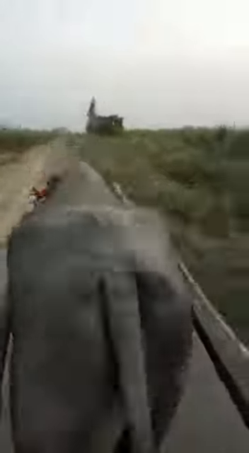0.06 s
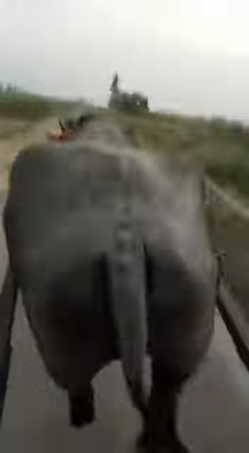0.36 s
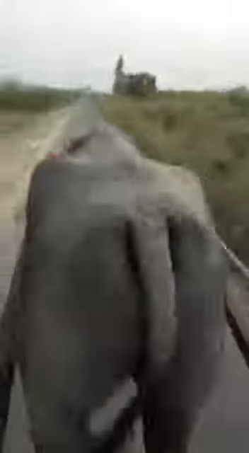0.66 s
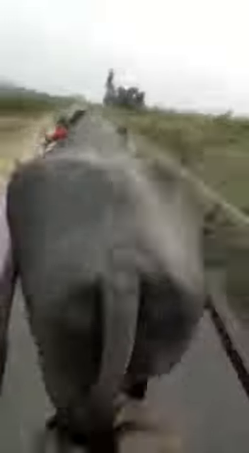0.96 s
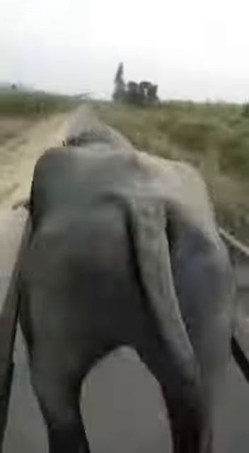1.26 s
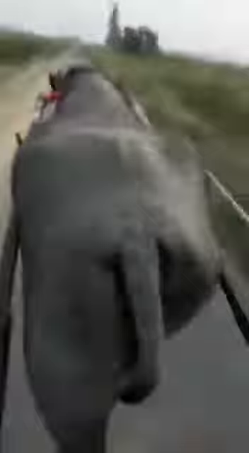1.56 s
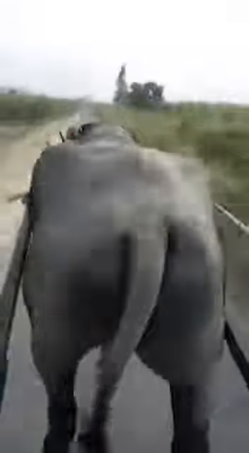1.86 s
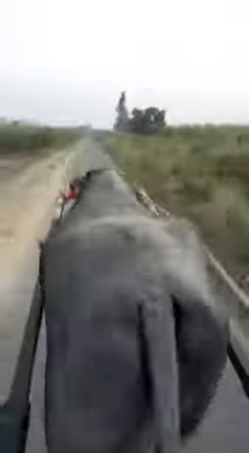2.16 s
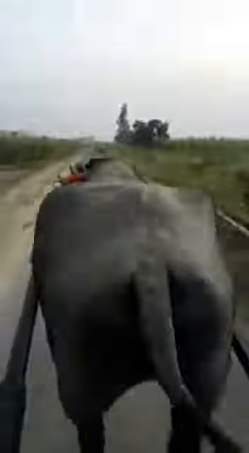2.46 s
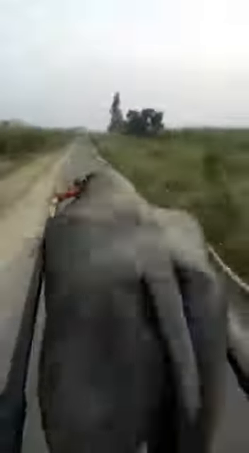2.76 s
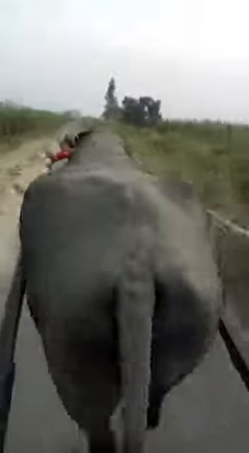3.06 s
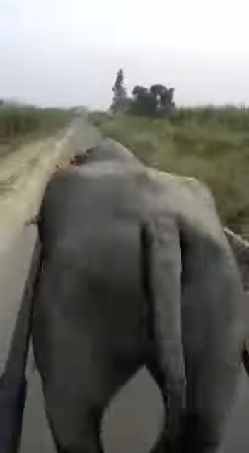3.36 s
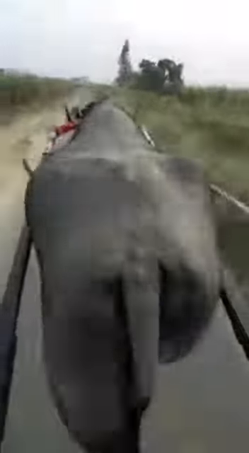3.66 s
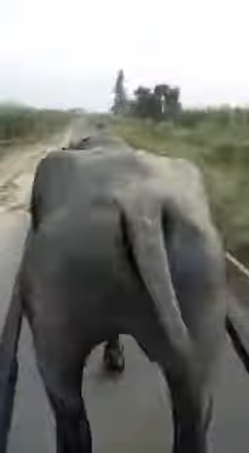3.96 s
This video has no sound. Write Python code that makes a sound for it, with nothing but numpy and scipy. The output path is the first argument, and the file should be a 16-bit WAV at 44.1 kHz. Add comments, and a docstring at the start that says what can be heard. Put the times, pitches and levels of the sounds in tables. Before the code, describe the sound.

Sharp paired hoof clops on pavement, with cart clacks, wheel rumble and wind buffeting.

```python
"""Buffalo cart on a paved road

From the driver's seat we hear hooves land in pairs, each with a double crack and a hollow ring,
then a lighter step scuffs the grit. The cart clacks, the harness clinks and the wheels rumble.
As the cart sways, wind buffets the two microphone openings in turn; the louder left side overloads."""
import sys
import numpy as np
from scipy import signal
from scipy.fft import rfft, irfft
from scipy.io import wavfile
from scipy.ndimage import uniform_filter1d

SR = 44100
rng = np.random.default_rng(int(sys.argv[2]) if len(sys.argv) > 2 else 0)


def persist_wave(psi):
    """Save psi, clipped to +-1, as 16-bit WAV."""
    counts = np.round(np.clip(psi, -1, 1) * 32767).astype(np.int16)
    wavfile.write(sys.argv[1], SR, np.atleast_2d(counts).T)


N = 176400  # 4 seconds
TIME = np.arange(N) / SR
HIT_RISE_S, CLACK_DECAY_S = 0.00047, 0.0024
RING_RISE_S, RING_DECAY_S = 0.0009, 0.0046


def gain(db):
    """Turn decibels into a number to multiply by."""
    return 10 ** (np.asarray(db) / 20)


def normalise(x):
    """Scale a signal so that its average power is 1."""
    return x / np.sqrt(np.mean(x ** 2))


def colour(x, tone):
    """Filter a sound with a (frequency, level) table; white noise keeps its overall level."""
    size = 4096
    hz, db = np.array(tone, float).T
    bins_hz = np.maximum(np.fft.rfftfreq(size, 1 / SR), 1)
    curve = normalise(gain(np.interp(np.log(bins_hz), np.log(hz), db)))
    # build the filter so that nothing sounds before the hit that causes it
    cepstrum = irfft(np.log(curve))
    cepstrum[1:size // 2] *= 2
    cepstrum[size // 2 + 1:] = 0
    response = irfft(np.exp(rfft(cepstrum)))
    return signal.fftconvolve(x, response[None], axes=1)[:, :N]


def wander(per_second):
    """A smooth random drift, about 1 in size."""
    hold = int(SR / per_second)
    steps = np.repeat(rng.standard_normal(N // hold + 1), hold)
    return normalise(uniform_filter1d(steps, hold)[:N])


def burst(start, rise_s, decay_s):
    """A loudness curve that rises quickly, then dies away."""
    out, first = np.zeros(N), int(start * SR)
    t = np.arange(min(SR // 4, N - first)) / SR
    out[first:first + len(t)] = (1 - np.exp(-t / rise_s)) * np.exp(-t / decay_s)
    return out


def noise_pair(shared=0.26):
    """Left and right white noise, partly alike."""
    left, other = rng.standard_normal((2, N))
    return np.array([left, shared * left + np.sqrt(1 - shared ** 2) * other])


def ring(start, notes, decay_s=RING_DECAY_S, detune=0.026):
    """A struck object rings; no two blows land on quite the same spot, so the pitches vary a little."""
    envelope = burst(start, RING_RISE_S, decay_s)
    audible, out = envelope > 1e-4, np.zeros(N)
    for hz, db in notes:
        pitch = hz * (1 + detune * rng.standard_normal())
        cycles = pitch * (TIME[audible] - start) + rng.random()
        out[audible] += 2 * gain(db) * np.sin(2 * np.pi * cycles)
    return out * envelope


def stride_db(stride_s=0.521, slack_at_s=0.47, swell_db=2.5):
    """The level swells and sinks as the cart is pulled and goes slack once a stride."""
    return -swell_db * np.cos(2 * np.pi * (TIME - slack_at_s) / stride_s)


# wind strength at the left and right openings (time [s], level [dB])
LEFT_GUSTS = [(0, -8), (.27, -20), (.37, -7), (.40, -16), (.51, -4.5), (.57, -15), (.64, -7.5), (.78, -26),
              (.905, -5.5), (1.01, -8), (1.07, -24.5), (1.43, -11), (1.54, -8), (1.70, -20.5), (1.99, -22),
              (2.012, -1), (2.14, -16), (2.20, -23.5), (2.30, -11), (2.435, -18.5), (2.47, 1), (2.53, 0.5),
              (2.555, -13), (2.60, -2.5), (2.71, -1), (2.76, -19), (2.95, -15.5), (3.01, -2.5), (3.06, 1),
              (3.10, -15.5), (3.18, -0.5), (3.25, -20.5), (3.30, -4), (3.36, -14.5), (3.40, -5.5),
              (3.45, -18), (3.50, 3.5), (3.55, 3), (3.59, -6), (3.695, -22), (3.722, -7.5), (3.85, -21.5),
              (4, -14)]
RIGHT_GUSTS = [(0, -23), (.09, -36), (.19, -19.5), (.50, -34), (.91, -18.5), (1.11, -36.5), (1.16, -19),
               (1.68, -38.5), (1.74, -17), (1.97, -23.5), (2.08, -45), (2.42, -21), (2.62, -35.5),
               (3.28, -37), (3.46, -17), (3.55, -34), (3.79, -41), (3.85, -16.5), (4, -30.5)]
# tone of a light wind (frequency [Hz], level [dB])
WIND_TONE = [(35, -18), (70, -2), (130, 2.5), (320, -4), (500, -9.5), (720, -15), (1200, -27),
             (9000, -85.5)]


def wind(gusts, level_db, flutter_db=3.5, bass_hz=251, strong_db=-16.5, bass_loss=0.84):
    """Air swirls at one opening: light gusts rumble and flutter, strong ones roar higher and steadier."""
    flow_db = np.interp(TIME, *np.array(gusts, float).T)
    flutter = flutter_db * np.clip(flow_db / strong_db, .5, 1) * wander(110)
    strength_db = flow_db + flutter
    swirls = colour(rng.standard_normal((1, N)), WIND_TONE)[0]
    bass = signal.sosfiltfilt(signal.butter(2, bass_hz, fs=SR, output="sos"), swirls)
    # in a strong gust the bass grows more slowly than the rest
    bass_gain = gain(-bass_loss * np.maximum(strength_db - strong_db, 0))
    return (swirls - bass + bass * bass_gain) * gain(strength_db + level_db)


# tone of the wheels and cart floor (frequency [Hz], level [dB])
RUMBLE_TONE = [(40, -20.5), (70, 11.5), (130, 15.5), (300, -2.5), (620, 1.5), (850, -22), (3000, -55)]
# jolts of the cart floor (time [s], level [dB])
FLOOR_JOLTS = [(.215, -1), (.797, -2), (1.273, -4), (1.769, -4.5), (2.125, -3)]


def wheels(rumble_db=-24, thud_hz=152, decay_s=0.0076):
    """The cart floor rumbles as the wheels roll, and thuds at each jolt."""
    rumble = colour(rng.standard_normal((2, N)), RUMBLE_TONE) * gain(rumble_db + 2 * wander(20))
    thuds = 0
    for at, db in FLOOR_JOLTS:
        swing = np.sin(2 * np.pi * thud_hz * (TIME - at))
        thuds += gain(db) * burst(at, decay_s / 2, decay_s) * swing
    return rumble + 2 * thuds


# hooves scuffing the road (time [s], fade time [s], level [dB])
HOOF_SCUFFS = [(.214, 0.016, -14.5), (0.427, 0.0088, -20), (.795, 0.022, -23.5), (0.9058, 0.013, -12),
               (1.755, 0.033, -27)]
# tone of the grit (frequency [Hz], level [dB])
GRIT_TONE = [(500, -10), (1400, 7.5), (3000, -5.5), (3900, -1), (5200, -11.5), (6800, -16.5), (8300, -40),
             (15000, -30.5)]


def grit(grains_per_s=1500, spread_db=5.5, grain_s=0.0028, roll_db=-39, step_scuff_s=0.013):
    """Fine grit hisses under the wheels, swelling with each stride, and spurts under scuffing hooves."""
    grains = (rng.random(N) < grains_per_s / SR) * gain(spread_db * rng.standard_normal(N))
    fading_energy = signal.lfilter([1], [1, -np.exp(-1 / (grain_s * SR))], grains ** 2)
    roughness = normalise(np.sqrt(fading_energy + 1))
    rolling = gain(roll_db + stride_db() + 3 * wander(24))
    slides = HOOF_SCUFFS + [(at, step_scuff_s, db) for at, db, _ in SOFT_STEPS]
    scuffs = sum(gain(db) * burst(at, HIT_RISE_S, fade_s) for at, fade_s, db in slides)
    return colour(roughness * np.hypot(rolling, scuffs) * noise_pair(), GRIT_TONE)


# clacks of the poles and yoke that join cart and buffalo (time [s], level [dB])
POLE_CLACKS = [(0.207, -17), (0.3161, -20), (0.3371, -16), (.7657, -17.5), (0.8651, -10.5), (1.1748, -13),
               (1.3861, -9.5), (1.9192, -9.5), (2.4453, -9.5), (2.8425, -13.5), (2.9748, -12)]
# tone of a clack (frequency [Hz], level [dB])
CLACK_TONE = [(600, 2.5), (2800, 1.5), (3800, 7), (5000, -4.5), (6800, -13), (8500, -29.5), (15000, -33)]


def cart(rattles_per_s=24, rattle_db=-23, spread_db=2):
    """The poles and yoke give dry clacks while loose parts rattle lightly."""
    clacks = sum(gain(db) * burst(at, HIT_RISE_S, CLACK_DECAY_S) for at, db in POLE_CLACKS)
    taps = rng.random(N) < rattles_per_s / SR
    tap_db = rattle_db + spread_db * rng.uniform(-1.9, 1, N) + stride_db()
    rattles = signal.fftconvolve(taps * gain(tap_db), burst(0, HIT_RISE_S, CLACK_DECAY_S))[:N]
    return colour((clacks + rattles) * noise_pair(), CLACK_TONE)


# hard knocks in the harness (time [s], level [dB])
HARNESS_KNOCKS = [(.579, -11.5), (3.5957, -12)]
# ringing notes of a knock and of a clink (frequency [Hz], level [dB])
KNOCK_NOTES = [(2100, -2.5), (2720, -3), (3200, -0.5)]
CLINK_NOTES = [(6550, 1), (7100, -3.5)]


def harness(clink_decay_s=0.0027):
    """A small metal part clinks with each light step; now and then a hard piece knocks."""
    clinks = sum(gain(db) * ring(at, CLINK_NOTES, clink_decay_s) for at, _, db in SOFT_STEPS)
    knocks = sum(gain(db) * ring(at, KNOCK_NOTES) for at, db in HARNESS_KNOCKS)
    hits = sum(gain(db) * burst(at, RING_RISE_S, RING_DECAY_S) for at, db in HARNESS_KNOCKS)
    return clinks + knocks + colour(hits * noise_pair(), CRACK_TONE)


# hoofbeats, the following and the leading hoof in turn
# (time [s], first hit [dB], delay to second hit [s], second hit [dB], hollow ring [dB])
HOOFBEATS = [(0.046, -3.5, 0.0081, -8.5, -6.5), (.4420, 0.5, 0.0039, -3.5, -2.5),
             (.5690, -5, 0.0083, -8, -10.5), (0.9673, 0.5, 0.005, -4, -2.5),
             (1.0995, -2.5, 0.0061, -8, -20), (1.4887, -0.5, 0.006, -5.5, -5.5),
             (1.6214, -9, 0.0044, -3, -17), (2.0297, 0.5, 0.0047, -9.5, -3.5),
             (2.151, -7, 0.0075, -5.5, -17), (2.5667, 1, 0.0089, -10, -11), (2.677, -10, 0.0096, -4, -14),
             (3.097, -4.5, 0.0064, -11, -19), (3.2049, -8.5, 0.0099, -3.5, -17),
             (3.6298, -3, 0.0034, -5.5, -11.5), (3.7430, -7.5, 0.009, -9, -12.5)]
# each stride's light third step, which also scuffs the grit and shakes the harness
# (time [s], step level [dB], clink level [dB])
SOFT_STEPS = [(0.166, -15.5, -36), (0.6871, -18.5, -37), (1.2083, -14, -30), (1.741, -15, -17),
              (2.2617, -15, -19), (2.795, -16.5, -20.5), (3.321, -21, -29.5), (3.870, -19, -32)]
# tone of a hard hit, such as hoof on road (frequency [Hz], level [dB])
CRACK_TONE = [(700, -10), (1400, -1.5), (1850, -10), (2250, -5), (2900, -9), (3600, -4), (4400, -9.5),
              (5600, -15.5), (6700, -16.5), (8300, -34.5), (15000, -38)]
# notes of the hoof's hard wall, one list for leading, one for following (frequency [Hz], level [dB])
WALL_NOTES = ([(2450, -23.5), (3750, -13)], [(2300, -11), (4200, -18), (6550, -19.5)])
# pitch of the hoof's hollow (leading hoof [Hz], following hoof [Hz])
HOLLOW_PITCH = (1383, 1603)


def hooves(crack_decay_s=0.0027, tail_decay_s=0.011, tail_db=-17.5):
    """A hoof cracks twice as it rolls onto the road; its wall and hollow ring. Light steps click once."""
    hits, rings = 0, 0
    for i, (start, first_db, delay, second_db, hollow_db) in enumerate(HOOFBEATS):
        foot = (i + 1) % 2  # 0 leads, 1 follows
        for at, db in ((start, first_db), (start + delay, second_db)):
            crack = burst(at, HIT_RISE_S, crack_decay_s)
            tail = gain(tail_db) * burst(at, HIT_RISE_S, tail_decay_s)
            hits += gain(db) * (crack + tail)
            rings += gain(db) * ring(at, WALL_NOTES[foot])
        rings += ring(start, [(HOLLOW_PITCH[foot], hollow_db)])
    for at, db, _ in SOFT_STEPS:
        hits += gain(db) * burst(at, HIT_RISE_S, CLACK_DECAY_S)
        rings += gain(db) * ring(at, WALL_NOTES[1])
    return colour(hits * noise_pair(), CRACK_TONE) + rings


# tone of the sheltered right opening compared with the left (frequency [Hz], level [dB])
RIGHT_TONE = [(900, -13.5), (2100, -15.5), (5500, -21.5), (7800, -1.5), (12000, -15.5)]


def scene(right_db=-10, right_delay_s=0.00026):
    """Buffalo and cart reach the right opening later and weaker; each side has its own wind."""
    buffalo_cart = hooves() + cart() + harness() + grit() + wheels()
    sheltered = colour(buffalo_cart[1:], RIGHT_TONE)[0] * gain(right_db)
    left = buffalo_cart[0] + wind(LEFT_GUSTS, level_db=2.5)
    right = np.roll(sheltered, round(right_delay_s * SR)) + wind(RIGHT_GUSTS, level_db=1.5)
    return np.array([left, right])


def record(dry, top_hz=15600):
    """The loudest peaks overload and are flattened, then the highest treble is cut."""
    treble_cut = signal.ellip(8, .2, 70, top_hz, fs=SR, output="sos")
    return signal.sosfilt(treble_cut, np.clip(dry, -1, 1))


dry = scene()
out = record(dry)
persist_wave(out)
```